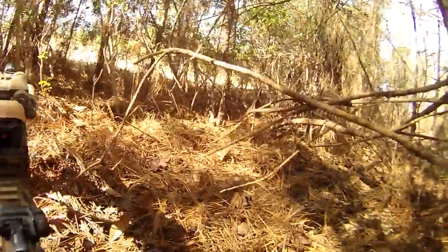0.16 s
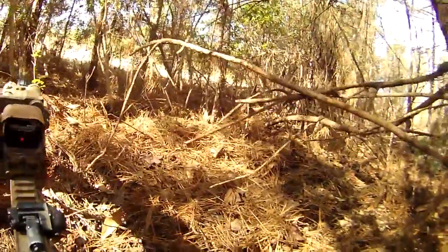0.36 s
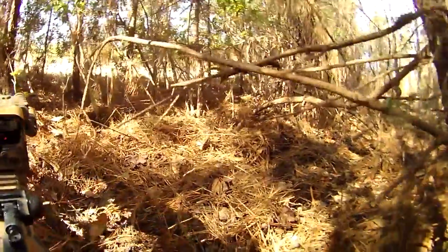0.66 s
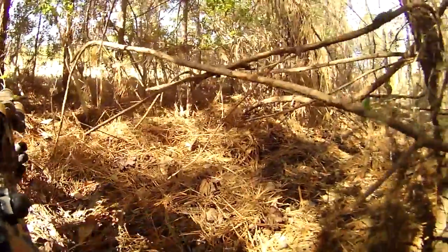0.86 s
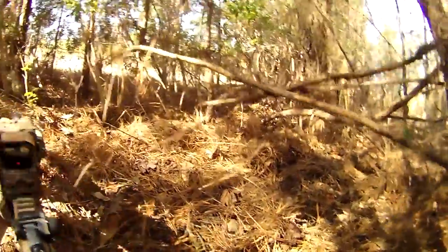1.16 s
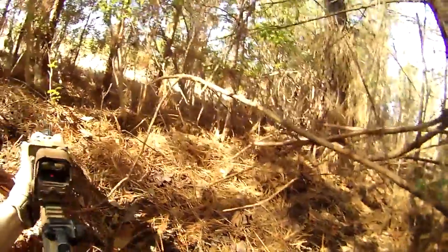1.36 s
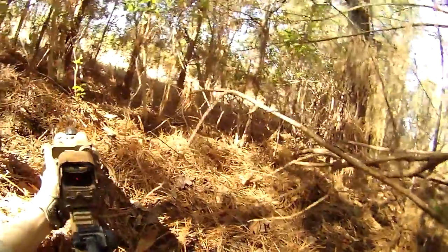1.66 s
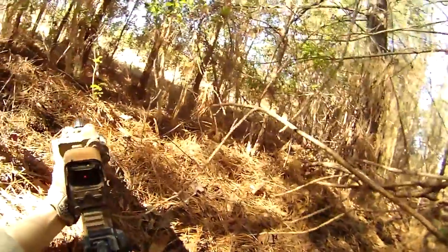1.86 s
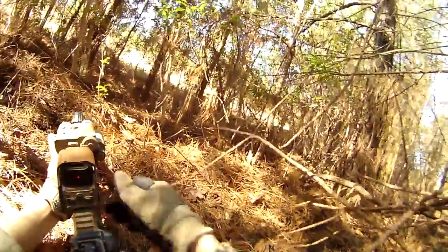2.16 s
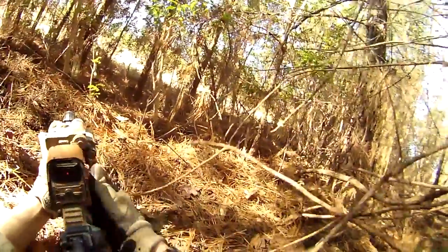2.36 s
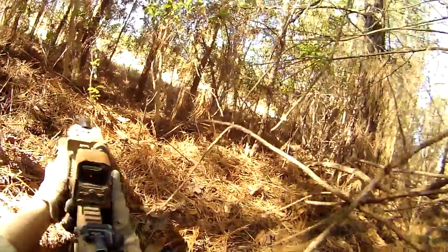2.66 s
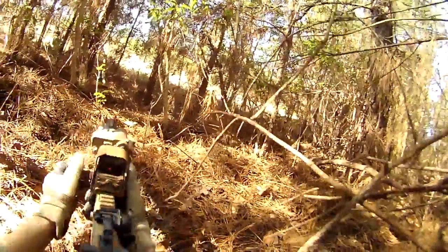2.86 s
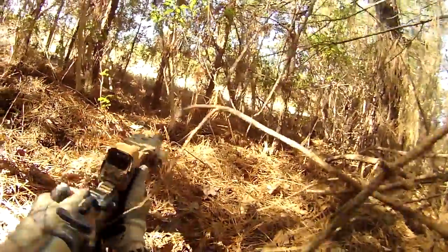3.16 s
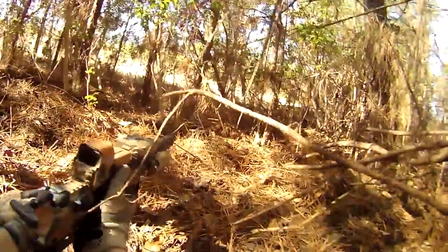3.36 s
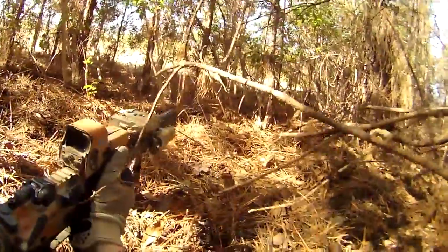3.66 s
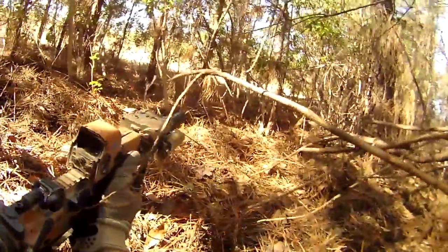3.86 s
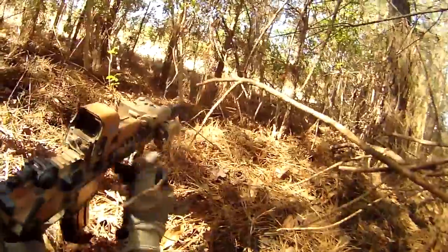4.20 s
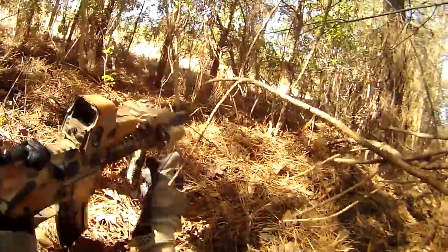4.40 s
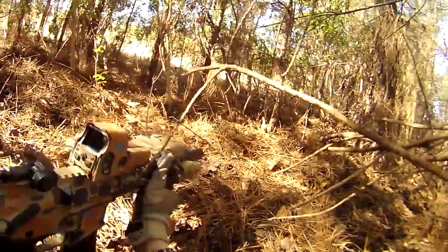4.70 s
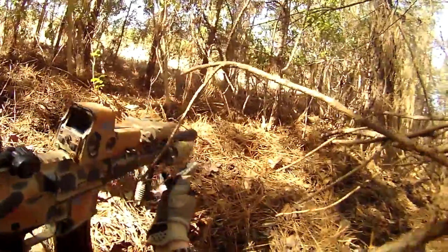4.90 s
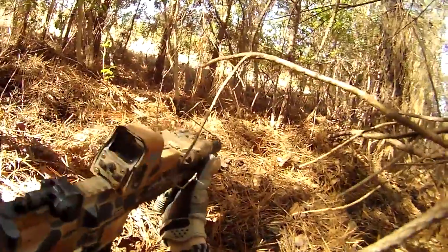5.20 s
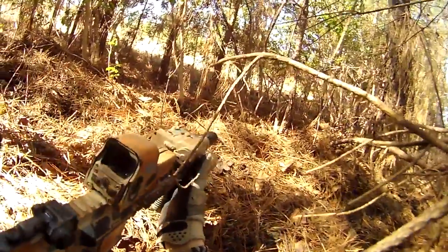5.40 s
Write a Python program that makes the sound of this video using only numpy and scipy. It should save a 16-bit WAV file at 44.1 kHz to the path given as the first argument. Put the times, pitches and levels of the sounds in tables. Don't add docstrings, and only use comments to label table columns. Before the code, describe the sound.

Someone shifts on a crackling woodland floor, twigs snapping and cloth rubbing, a small metallic click midway, and a cluster of knocks near the end.

```python
import sys
import numpy as np
from scipy import signal
from scipy.fft import rfft, irfft, next_fast_len
from scipy.io import wavfile

SR = 44100
rng = np.random.default_rng(int(sys.argv[2]) if len(sys.argv) > 2 else 0)


def file_out(sig):
    cols = np.atleast_2d(sig).T
    lim = np.clip(cols, -1, 1)
    pcm = np.round(lim * 32767).astype(np.int16)
    wavfile.write(sys.argv[1], SR, pcm)


def amplitude_ratio(level_db):
    exponent = np.asarray(level_db, float) / 20
    return 10 ** exponent


N = 244314

# (frequency [Hz], level [dB per Hz])
RUMBLE_COLOUR = [(8.8, -44), (15, 1.5), (86, -3.5), (123, -6), (190, -11.5), (312, -17), (371, -19.5),
                 (430, -19), (527, -22), (816, -29), (2950, -46), (4060, -47), (4700, -37), (7070, -33),
                 (16000, -69)]
# (frequency [Hz], level [dB per Hz])
RUSTLE_COLOUR = [(880, -40.5), (1500, -9.5), (2060, -8.5), (2390, -5.5), (2610, -5.5), (4080, -1.5),
                 (4920, -1.5), (6690, 1), (9370, 1.5), (11200, -9), (13100, -18), (15100, -13.5),
                 (16000, -20)]
# (frequency [Hz], level [dB per Hz])
DRAG_COLOUR = [(100, -28), (200, -14), (450, -9.5), (800, -1), (1400, -0.5), (2500, -4), (4500, -8),
               (9000, -45.5)]
# (frequency [Hz], level [dB per Hz])
THUD_COLOUR = [(40, -27), (120, -6), (400, 2.5), (1200, -0.5), (3000, -2.5), (9000, -35)]
# (frequency [Hz], level [dB], time to fall 60 dB [s])
LATCH_TONES = [(2230, -29, .008), (3700, -21, .006), (4800, -9, .005), (6500, -21, .010), (7300, 0, .003),
               (8800, -1, .003), (11600, -25, .006), (13800, -28, .007)]
# (time [s], peak level [dB], ring frequency [Hz], time to fall 60 dB [s], broad part [dB])
GEAR_KNOCKS = [(.087, -43, 1500, 0.025, -6), (.1445, -38, 980, .012, -23), (.785, -42, 1100, 0.034, -10),
               (.925, -39, 1400, 0.02, -6), (.948, -43, 1150, .018, -4), (1.455, -46, 1250, 0.02, -14),
               (1.811, -38.5, 576, 0.052, -2), (2.384, -55, 910, 0.016, -6), (2.848, -40, 700, 0.034, 2),
               (2.885, -35, 600, 0.034, 2), (2.886, -38, 200, .04, -6), (.231, -42, 950, .02, -10),
               (5.321, -33, 1600, .02, -8), (3.59, -41.5, 154, .05, 3), (4.19, -37, 450, 0.02, -3),
               (4.2028, -34, 1300, 0.0072, 6), (4.531, -47, 422, 0.017, 0), (4.894, -44, 1500, .15, -3),
               (5.241, -51, 630, .02, 2), (5.305, -32, 169, 0.053, 9), (5.309, -34, 610, 0.025, 8),
               (5.3187, -28, 2600, 0.022, -4)]
# (time [s], peak level [dB], ring frequency [Hz], time to fall 60 dB [s])
TWIG_SNAPS = [(.2255, -30, 5500, .011), (.2288, -29, 8500, .004), (.267, -23, 3000, .006),
              (.7841, -27, 9200, .013), (.8495, -34, 4000, .006), (.8728, -28, 7700, .005),
              (1.1843, -22.5, 6800, .01), (1.2067, -27, 9250, .006), (1.229, -27, 7000, .0098),
              (1.2414, -26, 8900, .009), (1.2888, -29.5, 9400, .017), (1.3118, -21, 8200, .008),
              (1.3122, -30, 4000, .008), (1.3222, -27, 9400, .01), (1.8098, -23, 9900, .015),
              (1.8154, -29, 6800, .01), (2.1023, -38, 7000, .013), (2.1281, -39, 5700, .021),
              (2.5361, -32, 8100, .0044), (2.6056, -29, 4500, .0064), (2.6337, -27, 10800, .004),
              (2.7165, -23.5, 10000, .0068), (2.7381, -25, 7300, .004), (2.8528, -31.5, 4670, .014),
              (3.1144, -29, 9600, .027), (4.1918, -34, 8600, .009), (5.3187, -24, 5800, .013)]
# (time [s], peak level [dB], ring frequency [Hz])
NEEDLE_TICKS = [(.084, -34, 8100), (.1448, -33.5, 9700), (.1905, -37, 4330), (.2822, -36, 5800),
                (.3842, -34, 8900), (.5984, -34, 7800), (.6137, -32, 7600), (1.1359, -31, 6300),
                (1.2719, -31, 5500), (1.3346, -34, 9300), (1.355, -35, 8400), (1.4151, -34, 7100),
                (1.4239, -34, 7100), (1.504, -38, 3400), (2.2948, -41, 6840), (2.4989, -38, 8400),
                (2.5667, -34, 8000), (2.6237, -32, 9500), (2.7508, -30, 9800), (4.0807, -35, 7700),
                (4.109, -36, 9400), (4.2111, -35, 2500), (4.2343, -36, 4700), (4.258, -38, 6600),
                (4.5021, -38, 8000), (4.5795, -38, 3800), (5.0984, -34, 6000), (5.3275, -36, 2800),
                (5.3555, -37, 6100), (5.3424, -38, 6800)]
# (peak time [s], peak level [dB], time to rise 10 dB [s], time to fall 10 dB [s])
SOLE_TREADS = [(.09, -46, .12, .07), (.19, -52, .2, .12), (.66, -45.5, .22, .3), (.78, -45.5, .15, .15),
               (.92, -47, .25, .16), (1.16, -47.5, .05, .2), (1.25, -50, .2, .2), (1.41, -45, .14, .045),
               (1.57, -50.5, .2, .35), (1.813, -45.5, .006, .04), (2.62, -44, .07, .3),
               (2.77, -48, .15, .15), (2.87, -51, .1, .16), (3.13, -44, .17, .2), (3.4, -50, .3, .3),
               (3.585, -40, .13, .12), (3.655, -45, .1, .03), (3.84, -50, .35, .045), (3.98, -51, .07, .25),
               (4.075, -53, .1, .04), (4.2, -49, .05, .12), (4.64, -50, .12, .045), (4.86, -54.5, .18, .1),
               (5.21, -52, .08, .2), (5.34, -52, .15, .04)]
# (peak time [s], peak level [dB], time to rise 10 dB [s])
CLOTH_SHIFTS = [(.315, -48, .05), (.375, -52, .04), (1.92, -55, .1), (2.01, -56.5, .05), (2.17, -61, .1),
                (2.284, -58, .13), (2.433, -57, .03), (2.493, -53.5, .06), (2.54, -55, .05),
                (4.331, -54, .08), (4.471, -47.5, .06), (3.45, -49, .06), (4.81, -55, .04),
                (4.97, -59, .12), (5.1, -57, .08), (5.312, -46, .025), (5.5, -60, .06)]
# (time [s], drag level [dB])
GROUND_WEIGHT = [(0, -62), (.43, -63), (.62, -54.5), (.85, -54), (1.09, -60), (1.99, -60), (2.07, -68),
                 (2.49, -67), (2.6, -59), (2.97, -58.5), (3.15, -50.5), (3.27, -58), (3.58, -50),
                 (3.72, -59), (4.4, -63), (5.1, -63), (5.28, -59), (5.54, -68)]


def rms_one(x):
    return x / np.sqrt(np.mean(x ** 2) + 1e-20)


def filtered(x, order, hz, kind):
    return signal.sosfilt(signal.butter(order, hz, kind, fs=SR, output="sos"), x)


def shaped(x, spectrum):
    size = next_fast_len(x.shape[-1] + 8192, real=True) // 2 * 2
    hz, level_db = np.transpose(spectrum)
    grid = np.maximum(np.arange(size // 2 + 1) * SR / size, 1)
    gain = amplitude_ratio(np.interp(np.log(grid), np.log(hz), level_db))
    cepstrum = irfft(np.log(gain), size)
    cepstrum[1:size // 2] *= 2
    cepstrum[size // 2 + 1:] = 0
    response = np.exp(rfft(cepstrum))
    return rms_one(irfft(rfft(x, size) * response, size)[..., :x.shape[-1]])


def drift(rate_hz):
    r = np.exp(-2 * np.pi * rate_hz / SR)
    noise = rng.standard_normal(N + SR)
    settled = signal.lfilter([1], [1, -2 * r, r * r], noise)[SR:]
    return rms_one(settled)


def resonate(x, hz, t60_s):
    r = amplitude_ratio(-60 / (t60_s * SR))
    w = 2 * np.pi * hz / SR
    return signal.lfilter([0, np.sin(w)], [1, -2 * r * np.cos(w), r * r], x)


def coloured(spectrum, together_db, own_db, flicker_hz):
    lowest_hz = spectrum[0][0]
    edges = lowest_hz * 2 ** np.arange(0, np.log2(20000 / lowest_hz), .5)
    noise = rng.standard_normal((2, N))
    shared = together_db * drift(flicker_hz)
    own = drift(flicker_hz)
    out = 0
    for k, (low, high) in enumerate(zip(edges, edges[1:])):
        band = filtered(noise[k % 2], 2, [low, high], "band")
        out = out + band * amplitude_ratio(shared + own_db * np.roll(own, k * 17011))
    return shaped(out, spectrum)


def breaks(events, cycles, colour, settle_db):
    size, first_crack = 4096, 3.5
    out = np.zeros(N + size)
    t60_s = np.array(events)[:, 3:4]
    dying_db = -60 * np.arange(size) / SR / t60_s
    fade = amplitude_ratio(dying_db) + amplitude_ratio(settle_db + dying_db / 1.9)
    puffs = rng.standard_normal((len(events), size)) * fade
    puffs[:, 0] = first_crack
    broad = shaped(puffs, colour)
    for (s, peak_db, hz, _, broad_db), puff, wide in zip(events, puffs, broad):
        rung = np.diff(resonate(puff, hz, cycles / hz), prepend=0)
        hit = rung / abs(rung).max() + amplitude_ratio(broad_db) * wide / abs(wide).max()
        out[round(s * SR):][:size] += amplitude_ratio(peak_db) * hit / abs(hit).max()
    return out[:N]


def rumble_and_hiss():
    return amplitude_ratio(-51.5) * shaped(rng.standard_normal(N), RUMBLE_COLOUR)


def latch():
    at, rattle_db, rattle_t60_s = round(2.4232 * SR), -17, .016
    clicks = np.full(N, 1e-18)
    rattle_fade = amplitude_ratio(rattle_db - 60 * np.arange(600) / SR / rattle_t60_s)
    clicks[at:at + 600] = rattle_fade * rng.standard_normal(600)
    clicks[[at, at + 6, at + 11, at + 17]] = .2, .7, .8, 1
    rung = sum(amplitude_ratio(db) * resonate(clicks, hz, t60_s) for hz, db, t60_s in LATCH_TONES)
    rung = filtered(rung, 2, [1900, 12000], "band")
    return amplitude_ratio(-12) * rung / abs(rung).max()


def knocks():
    return breaks(GEAR_KNOCKS, cycles=6.4, colour=THUD_COLOUR, settle_db=-26)


def snaps():
    twig_broad_db, tick_t60_s, tick_broad_db = -1.5, .006, .5
    events = [(*twig, twig_broad_db) for twig in TWIG_SNAPS]
    events += [(*tick, tick_t60_s, tick_broad_db) for tick in NEEDLE_TICKS]
    broken = breaks(events, cycles=11.4, colour=RUSTLE_COLOUR, settle_db=-14)
    return filtered(broken, 2, 1700, "high")


def crackle(per_s, spread_db):
    born = rng.random(N) < per_s * amplitude_ratio(5 * drift(25)) / SR
    sizes = amplitude_ratio(spread_db * np.minimum(rng.exponential(1, N), 2.5))
    fade = signal.lfilter([1], [1, -.96], sizes * born)
    return shaped(rng.standard_normal(N) * fade, RUSTLE_COLOUR)


def movement():
    t = np.arange(0, N + 64, 64) / SR
    power = amplitude_ratio(2 * -66)
    moves = SOLE_TREADS + [(s, db, rise, rise) for s, db, rise in CLOTH_SHIFTS]
    for s, db, rise, fall in moves:
        slope = np.maximum((s - t) / rise, (t - s) / fall)
        power = power + amplitude_ratio(2 * (db - 10 * slope))
    return np.interp(np.arange(N) / SR, t, 10 * np.log10(power))


def rubbing():
    rustle_db = movement()
    swing_db = rustle_db + 52
    drag_db = np.interp(np.arange(N) / SR, *np.transpose(GROUND_WEIGHT))
    fine = coloured(RUSTLE_COLOUR, together_db=1.45, own_db=2, flicker_hz=25)
    fine = fine + amplitude_ratio(-6.5) * crackle(per_s=570, spread_db=4.5)
    air_hz = 11500
    air = filtered(fine, 4, air_hz, "high")
    body = filtered(fine, 4, air_hz, "low")
    coarse = coloured(DRAG_COLOUR, together_db=1.12, own_db=2, flicker_hz=13.3)
    slips = amplitude_ratio(rustle_db - .5) * (body + amplitude_ratio(-.03 * swing_db) * air)
    drag = amplitude_ratio(drag_db + 2 + .2 * swing_db) * coarse
    return slips + drag


def scene():
    return (rumble_and_hiss() + latch() + knocks() + snaps() + rubbing())[None]


def roll_off(x):
    return signal.sosfilt(signal.butter(12, 16770, fs=SR, output="sos"), x)


def record(dry):
    top_cut = signal.cheby2(10, 50, 16800, fs=SR, output="sos")
    mix = signal.sosfilt(top_cut, dry)
    return roll_off(mix)


dry = scene()
out = record(dry)
file_out(out)
```